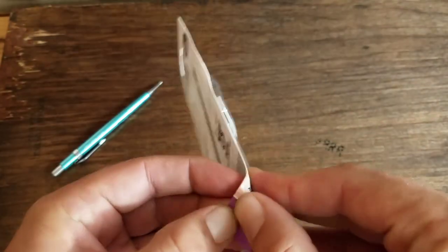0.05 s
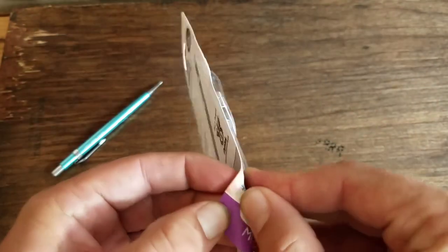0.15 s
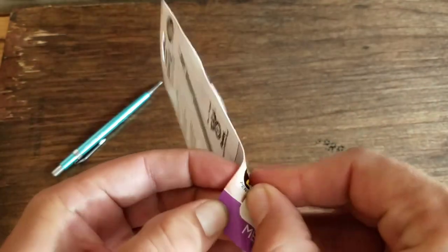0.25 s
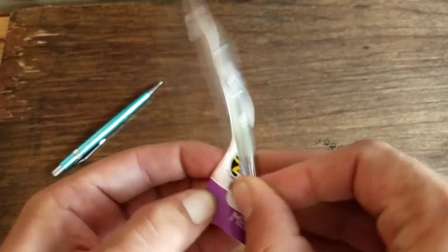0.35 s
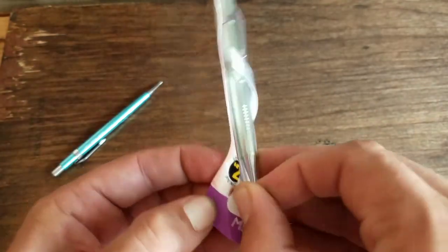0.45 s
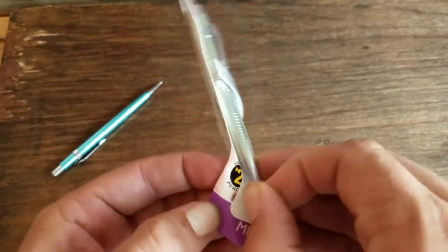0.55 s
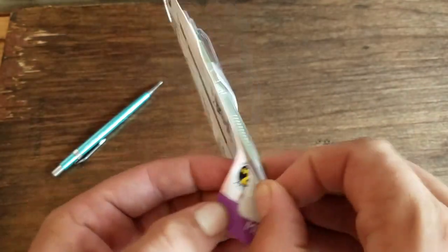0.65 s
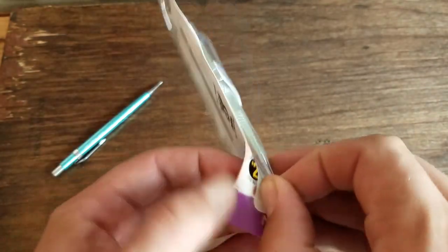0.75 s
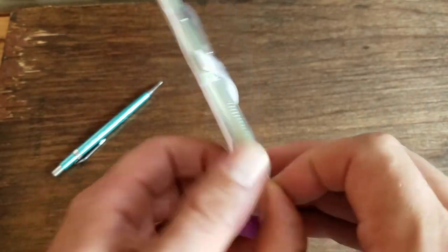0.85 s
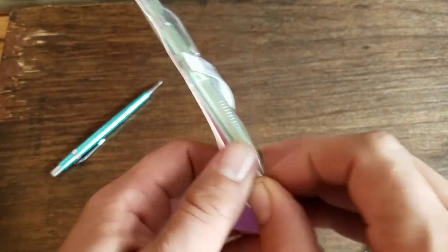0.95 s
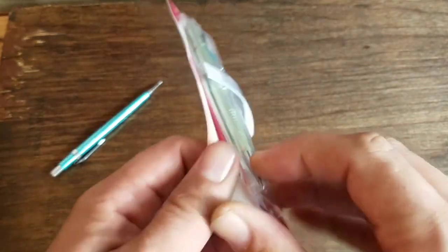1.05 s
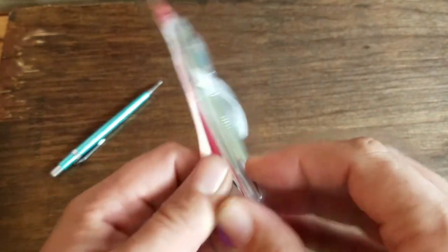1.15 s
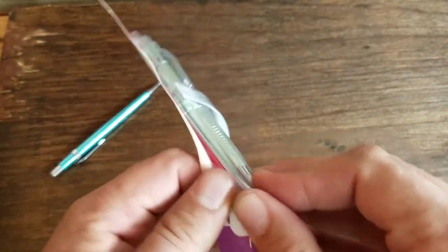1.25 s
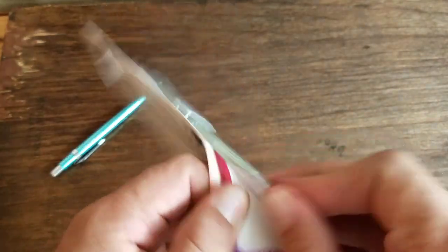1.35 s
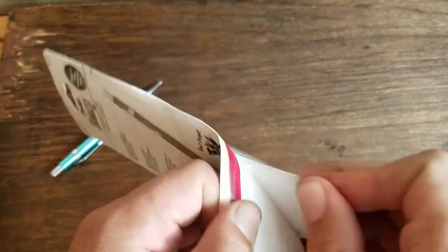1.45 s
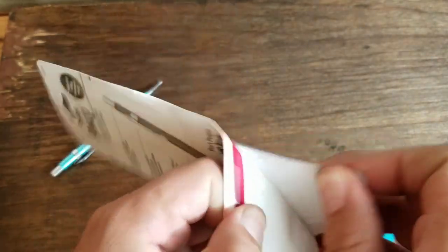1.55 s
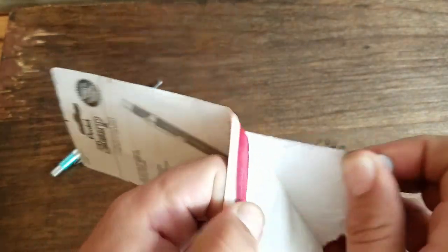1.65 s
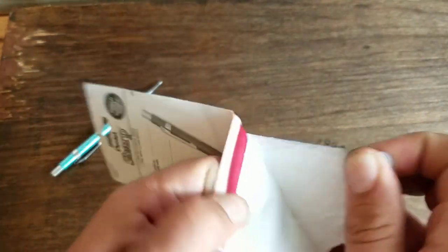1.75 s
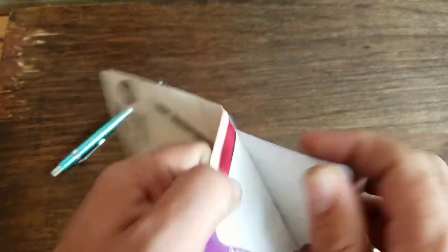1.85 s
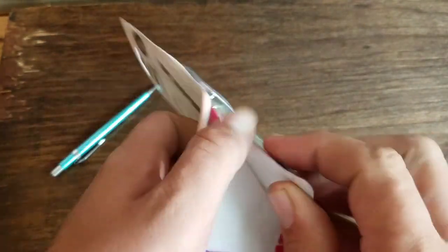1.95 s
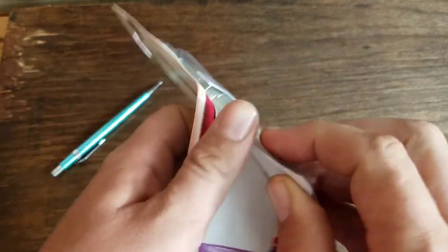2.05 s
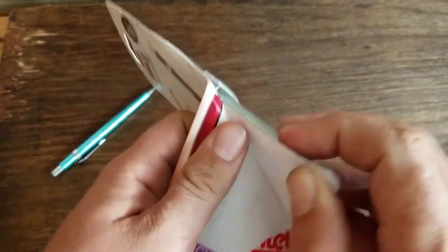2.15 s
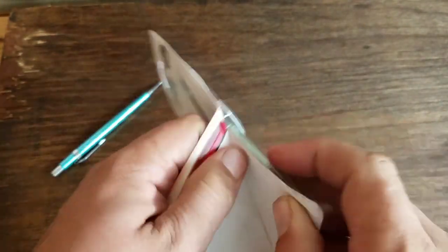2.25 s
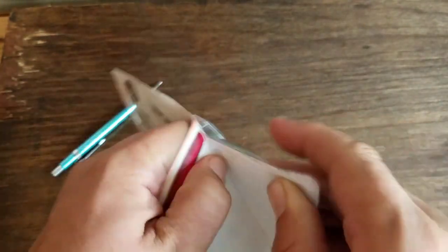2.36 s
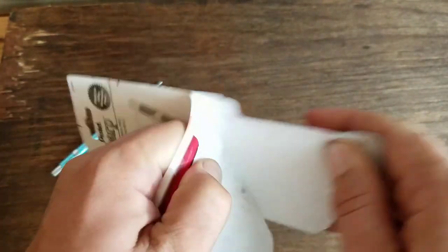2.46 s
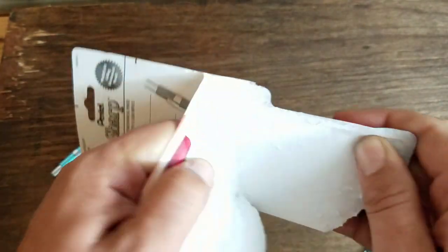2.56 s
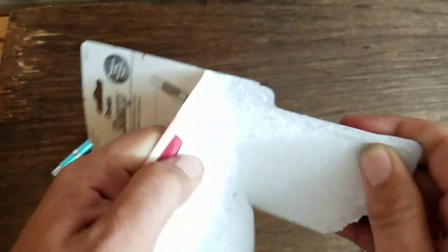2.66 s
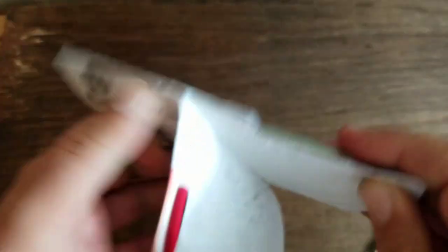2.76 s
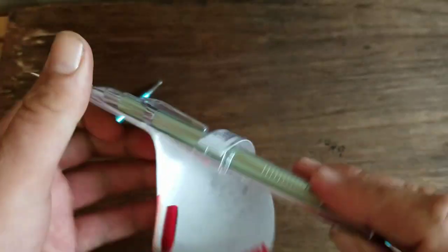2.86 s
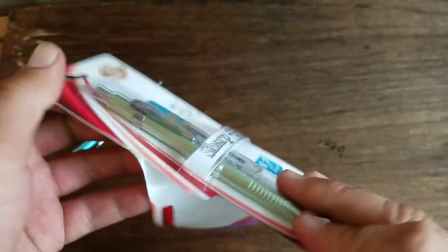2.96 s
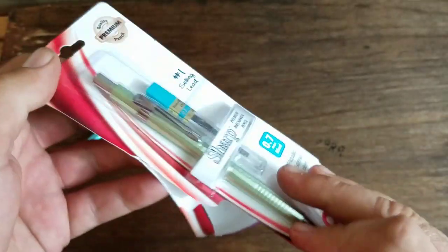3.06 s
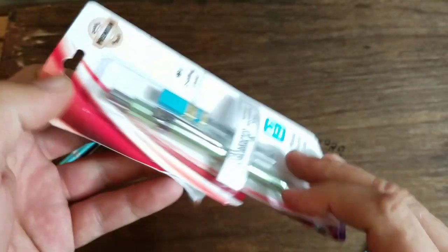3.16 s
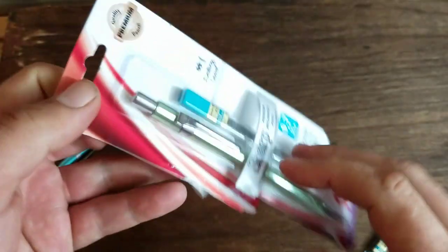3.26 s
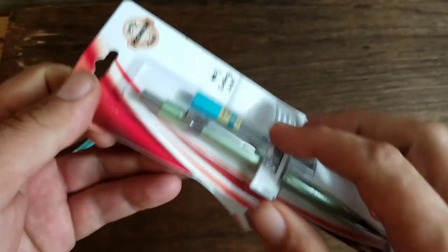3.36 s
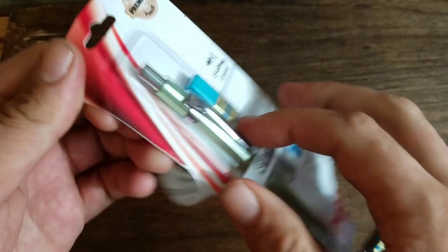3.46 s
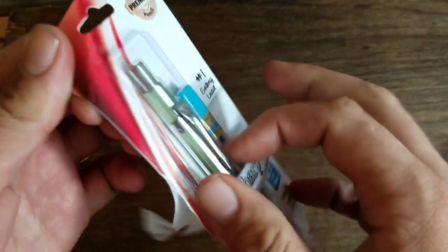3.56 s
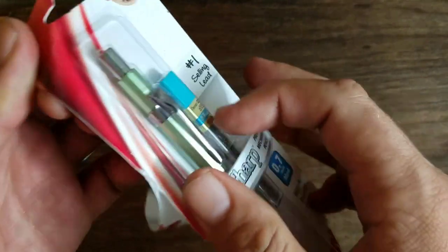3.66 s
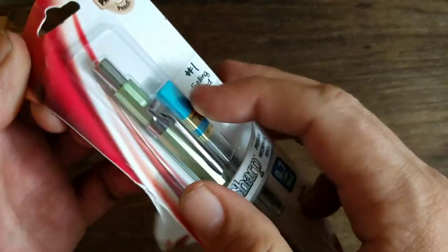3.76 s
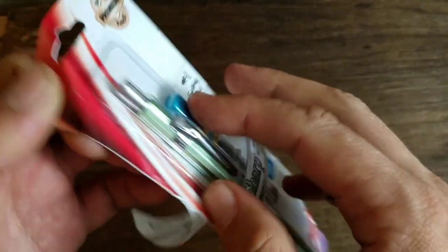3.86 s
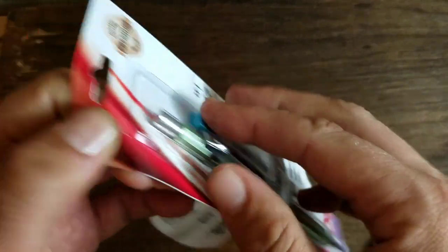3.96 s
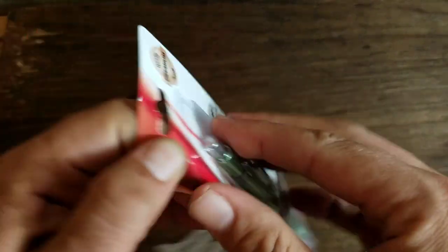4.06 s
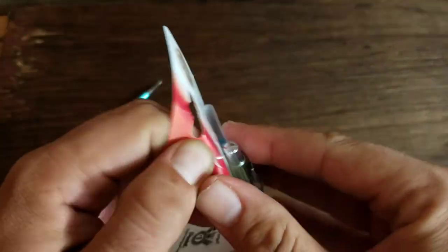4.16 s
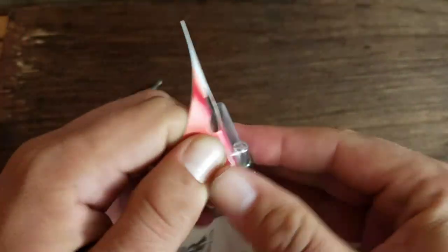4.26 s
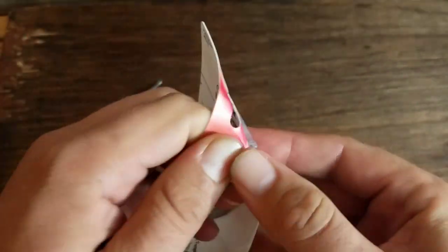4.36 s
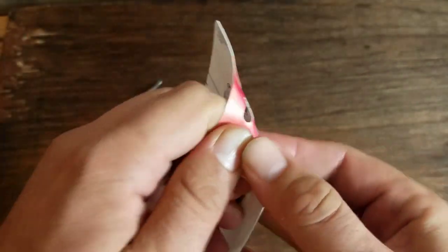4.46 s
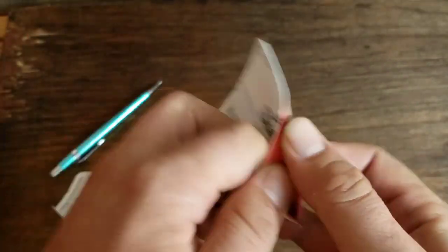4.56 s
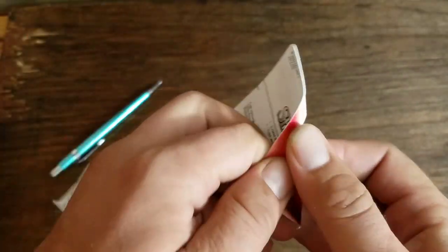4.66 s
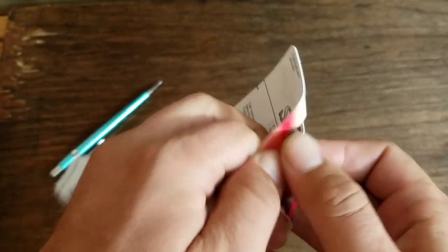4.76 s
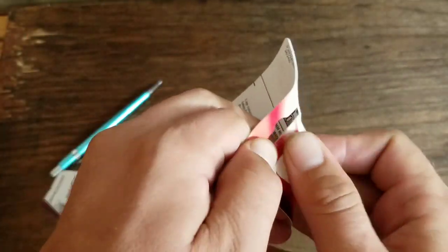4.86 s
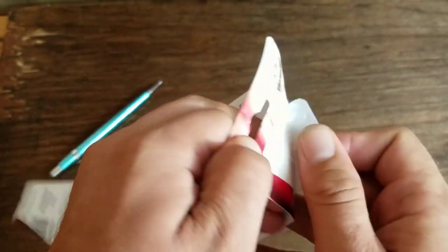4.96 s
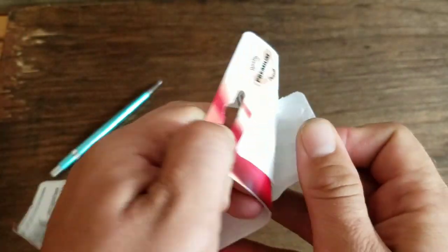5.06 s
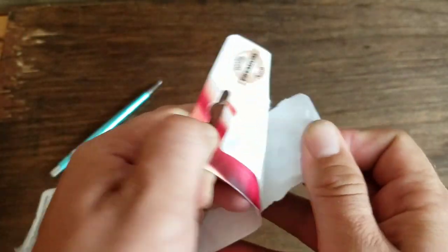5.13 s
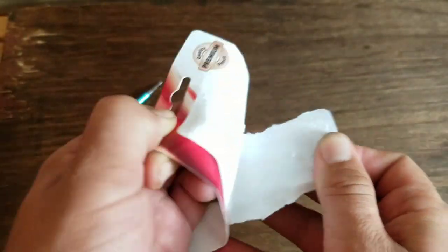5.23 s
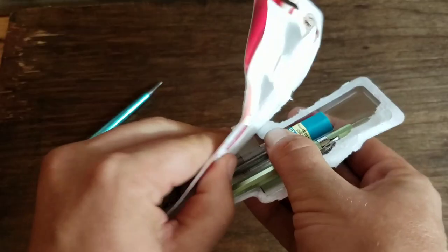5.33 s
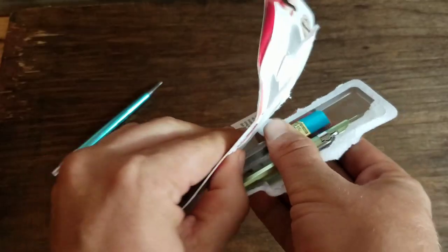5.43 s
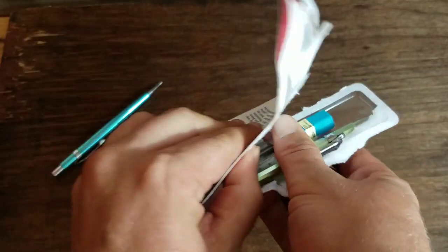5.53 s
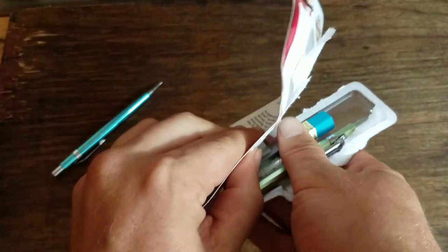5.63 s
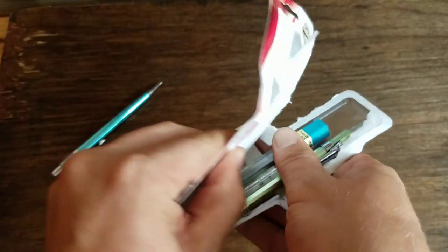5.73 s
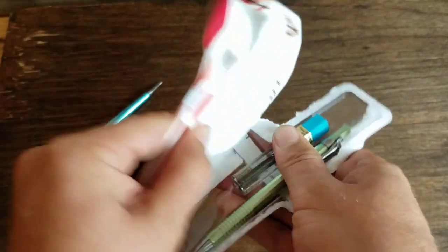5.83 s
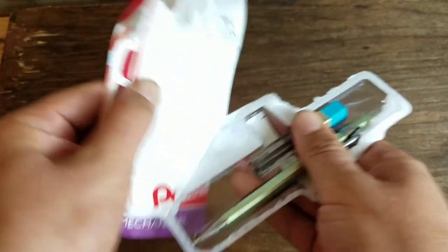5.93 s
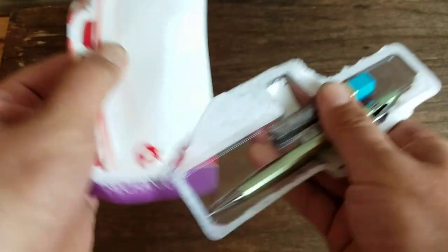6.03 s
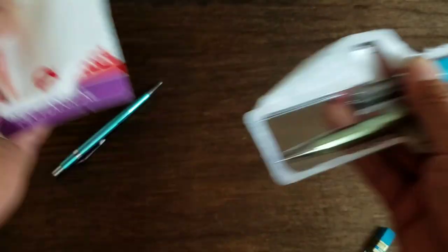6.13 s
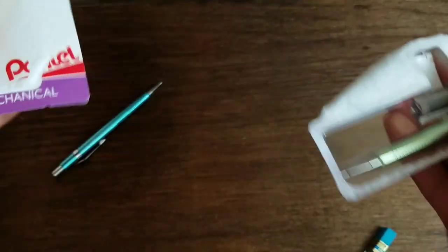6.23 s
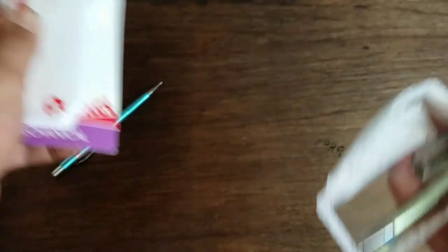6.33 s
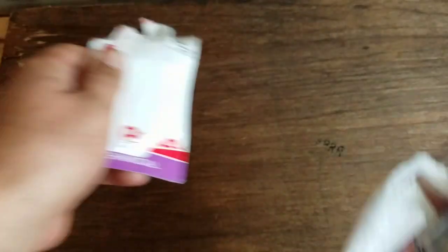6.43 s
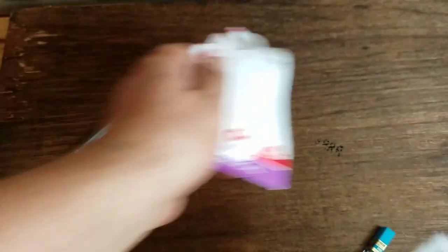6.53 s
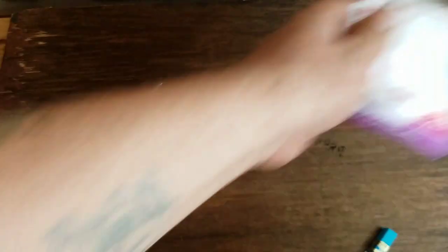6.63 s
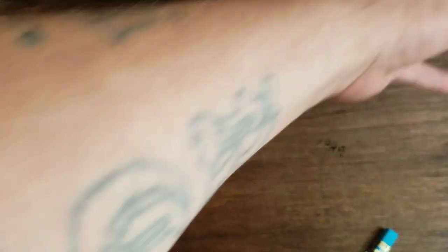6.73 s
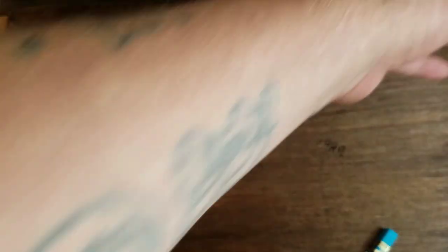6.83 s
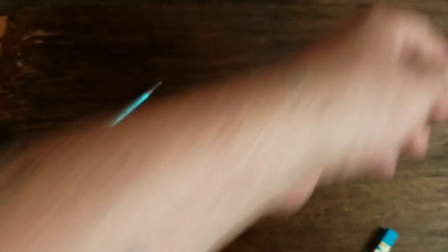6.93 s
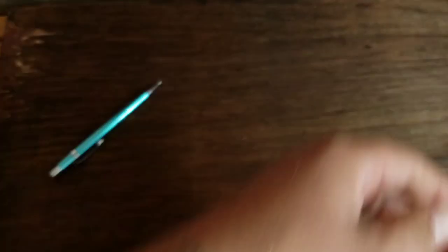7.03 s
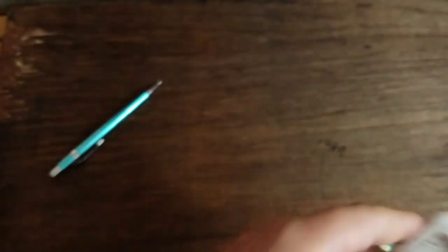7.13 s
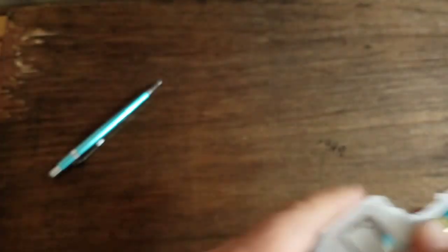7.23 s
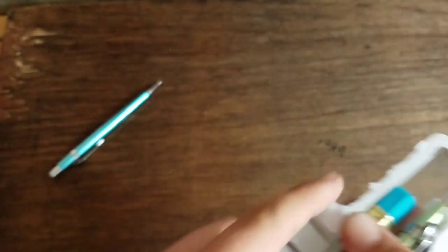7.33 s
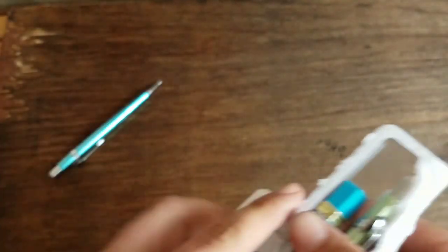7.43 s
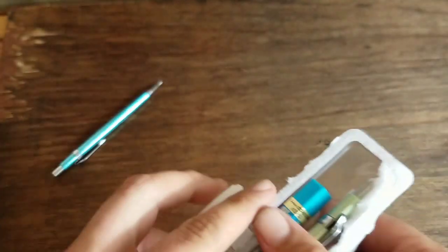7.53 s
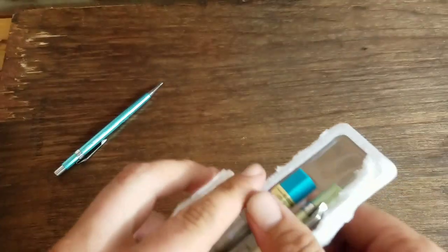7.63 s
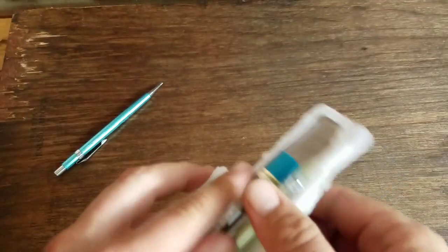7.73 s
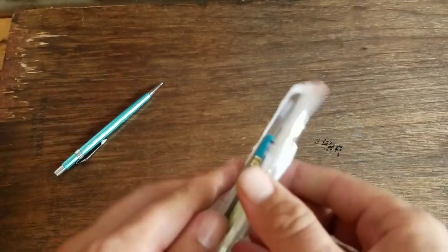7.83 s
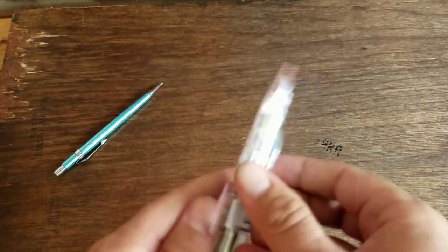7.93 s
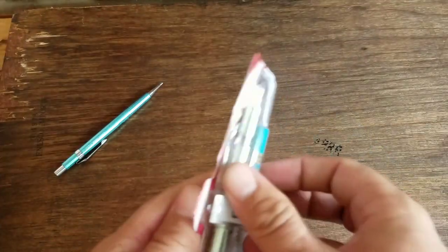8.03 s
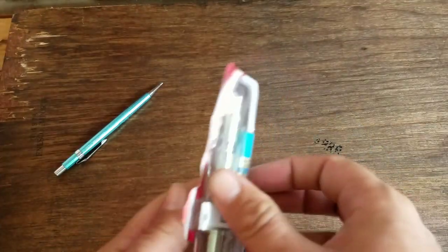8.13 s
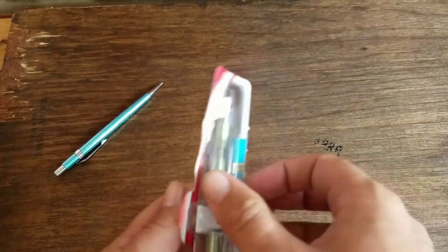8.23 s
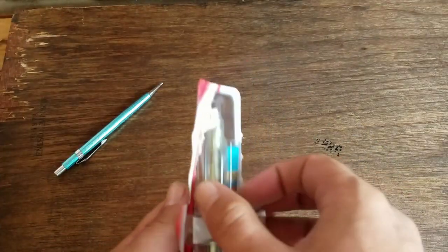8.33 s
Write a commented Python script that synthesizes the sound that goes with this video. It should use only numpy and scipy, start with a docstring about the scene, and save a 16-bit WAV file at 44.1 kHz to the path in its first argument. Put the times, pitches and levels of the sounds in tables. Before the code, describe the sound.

Very close to the microphone, hands work open a card-backed plastic pack. Light fizzing crackles and clicks grow into two fibrous rips with hard plastic pops, then turning and rustling. Two more rough bursts of tearing follow, before a lull with dull bumps on the wooden desk and a few last clicks. Small dry room, low rumble and faint hiss, stereo.

```python
"""At a wooden desk in a small room, two hands peel the card off a plastic blister pack, close to a phone's two ports.
Card fibres break by the thousand: they fizz, shake the card and flap its loose end.
The stiff shell buckles in decaying sines and noise with low knocks; noise-driven modes make short creaks.
Dull sine thumps come off the desk, decaying noise is the room's answer, and shaped noise is low rumble and faint hiss."""
import sys
import numpy as np
from scipy import signal
from scipy.fft import rfft, irfft, next_fast_len
from scipy.io import wavfile
from scipy.ndimage import map_coordinates

SR = 44100
rng = np.random.default_rng(int(sys.argv[2]) if len(sys.argv) > 2 else 0)


def inscribe(sig):
    """Save sig as 16-bit PCM at rate SR to the path in sys.argv[1].

    A 1-D sig is mono; a 2-D sig holds one channel per row.
    Samples are clipped to [-1, 1] before scaling.
    """
    pcm = np.round(np.clip(np.atleast_2d(sig).T, -1, 1) * 32767)
    wavfile.write(sys.argv[1], SR, pcm.astype(np.int16))


N = 369999


def amp(db):
    """Gain of a level in dB."""
    return 10 ** (np.asarray(db) / 20)


def unit(x):
    """x at rms 1."""
    return x / np.sqrt(np.mean(x ** 2) + 1e-20)


def along(points, hz):
    """Read (frequency [Hz], value) points on a log frequency axis."""
    f, v = np.transpose(points)
    return np.interp(np.log(hz + 1), np.log(f + 1), v)


def curves(rows):
    """One value per sample for each column after the time."""
    s, *cols = np.transpose(rows)
    return [np.interp(np.arange(N) / SR, s, c) for c in cols]


def wobble(rate):
    """A smooth random curve, rate knots a second."""
    knots = rng.standard_normal(int(N * 400 / SR) + 4)
    return map_coordinates(knots, [np.arange(N) * min(rate, 399) / SR])


def filtered(x, response):
    """x times a complex response of frequency."""
    m = next_fast_len(N + SR // 2)
    return irfft(rfft(x, m) * response(np.fft.rfftfreq(m, 1 / SR)), m)[..., :N]


def modes(table):
    """The causal response of resonances (frequency [Hz], width [Hz], level [dB]), with alternating signs."""
    def response(f):
        total = 0
        for k, (centre, width, db) in enumerate(table):
            damping = 1j * f * width
            total = total + (-1) ** k * amp(db) * damping / (centre * centre - f * f + damping)
        return total
    return response


def ports(pair, alike):
    """Two unrelated signals mixed to a left and a right that are alike by frequency."""
    def mid_side(hz):
        turn = np.arccos(np.clip(along(alike, hz), -1, 1)) / 2
        return np.array([np.cos(turn), np.sin(turn)])
    mid, side = filtered(pair, mid_side)
    return np.array([mid + side, mid - side])


# colour of the quiet room: (frequency [Hz], relative density [dB per Hz])
AIR_COLOUR = [(15, -39), (25, -1), (136, -11.5), (267, -9), (411, -19), (524, -20.5), (744, -24),
              (898, -29), (1000, -26), (1580, -29.5), (2130, -25.5), (7140, -37.5), (15600, -36.5)]
# how much of the air the ports share: (frequency [Hz], left-right likeness [-1 to 1])
AIR_LIKENESS = [(60, 0.96), (180, 0.97), (550, 0.62), (1650, 0.089), (4970, 0.02), (15000, 0.03)]
# the rumble sinks for a while: (time [s], level before wobble [dB])
RUMBLE_LEVEL = [(0.0, -49), (5.23, -48), (5.28, -62), (6.55, -60.5), (6.9, -50), (8.39, -47)]


def air():
    """Rumble largely shared by both ports, hiss that is nearly each port's own."""
    noise = filtered(rng.standard_normal((2, N)), lambda hz: amp(along(AIR_COLOUR, hz)))
    pair = ports(noise, AIR_LIKENESS)
    low = filtered(pair, lambda hz: 1 / (1 + (hz / 200) ** 4))
    hiss = pair - low
    swell = amp(curves(RUMBLE_LEVEL)[0] + 3.1 * wobble(9.6))
    return (swell * low + amp(-57.5) * hiss) / np.sqrt(np.mean(low ** 2))


# the dying of the room: (frequency [Hz], t60 [s])
ROOM_DECAY = [(200, 0.18), (2000, 0.034), (12000, 0.05)]


def room(x):
    """Each frequency of the answer dies at its own speed; the hands move, so the echoes keep changing."""
    out, step = np.zeros((2, N + SR)), SR // 5
    for at in range(0, N, step):
        hz, t, z = signal.stft(rng.standard_normal((2, SR // 3)), SR, nperseg=256)
        fade = amp(-60 * t / along(ROOM_DECAY, hz)[:, None])
        tail = signal.istft(z * fade, SR, nperseg=256)[1]
        tail[1] = 0.73 * tail[0] + 0.65 * tail[1]  # left and right partly alike
        echo = signal.fftconvolve(x[None, at:at + step], tail / np.linalg.norm(tail[0]), axes=1)
        out[:, at + 90:][:, :echo.shape[1]] += echo  # a gap of 90 samples, about 2 ms
    return out[:, :N]


# hands and card bump the desk: (time [s], relative level [dB], pitch [Hz])
DESK_THUMPS = [(2.694, -48, 207), (3.366, -38.5, 89), (4.902, -37, 114), (6.409, -49, 130),
               (6.618, -49.5, 235), (6.834, -35, 234), (6.862, -45, 121), (6.9, -39.5, 284)]


def thumps():
    """Soft flesh on wood: a softly struck sine dies in a few dull cycles."""
    out, t = np.zeros(N + SR), np.arange(SR // 4) / SR
    for s, db, hz in DESK_THUMPS:
        soft_start = 1 - np.exp(-t / 0.0066)
        fade = amp(db + 11 - 60 * t / 0.12)
        out[round(s * SR):][:len(t)] += fade * soft_start * np.sin(2 * np.pi * hz * t)
    return out[:N]


# the bent shell creaks on one note: (time of the peak [s], level [dB], pitch [Hz], t60 [s])
SHELL_CREAKS = [(1.01, -34.5, 1330, 0.04), (1.963, -17.5, 2490, 0.045), (2.585, -34, 1380, 0.046),
                (5.481, -43, 1820, 0.11), (5.601, -29.5, 1980, .035), (5.888, -25.5, 1750, 0.048),
                (5.942, -31.5, 1430, .06), (6.9, -28.5, 1780, .035), (7.925, -35.5, 2220, 0.072)]
CREAK_RISE, CREAK_WIDTH_HZ = 0.6, 220  # swell time over dying time; breadth of the note


def creaks():
    """Plastic slips on card in quick uneven steps that ring one mode, swelling and dying."""
    out, t = np.zeros((2, N + SR)), np.arange(-SR // 10, SR // 10) / SR
    ringing = t[t >= 0]
    for s, db, hz, t60 in SHELL_CREAKS:
        slips = rng.standard_normal((2, len(t))) * (rng.random(len(t)) < 1500 / SR)
        mode = amp(-27 * CREAK_WIDTH_HZ * ringing) * np.sin(2 * np.pi * hz * ringing)
        note = unit(signal.fftconvolve(slips, mode[None], axes=1)[:, :len(t)])
        swell = amp(db - 60 * np.maximum(t, -t / CREAK_RISE) / t60)
        out[:, round(s * SR) - SR // 10:][:, :len(t)] += swell * note
    return out[:, :N]


# the shell buckles: (time [s], relative level [dB], pitch of the dent [Hz],
#                     knock over the snap, relative [dB], noisy crack over the snap, relative [dB])
SHELL_SNAPS = [(0.026, -33.5, 1830, -27, -19), (0.265, -61, 3500, -30, 5), (0.304, -39, 2846, -30, 6.5),
               (0.416, -44, 1830, -30, 3), (0.495, -13, 2790, -51, -15.5), (0.54, -21.5, 2380, -38, -7),
               (0.648, -27, 2440, -19, -28), (0.734, -37, 2280, -35, -26), (0.747, -23, 2270, -13, 1),
               (0.793, -30, 1890, -39, -11), (1.007, -19.5, 2150, -35, 3.5), (1.066, -50.5, 3540, -30, 14),
               (1.379, -18, 2510, -43, -11), (1.412, -9.5, 2930, -34, -20), (1.57, -29, 3130, -40, 1),
               (1.601, -17.5, 2480, -40, -15.5), (1.692, -25, 2530, -40, -13), (1.765, -26, 1300, -29, -43),
               (1.794, -24, 1400, -33, -37), (1.867, -24, 1530, -29, -3), (1.901, -7, 2460, -17, -27),
               (1.924, -17.5, 1230, -21, -34), (2.058, -6.5, 2530, -15, -17), (2.077, -9, 2620, -28, -29),
               (2.089, -21.5, 2580, -21, -22), (2.156, -24, 2070, -14, -20), (2.178, -25, 1510, -31, -17),
               (2.228, -16.5, 2960, -41, -9.5), (2.36, -3.5, 1780, -32, -23), (2.397, -9, 2260, -33, -21),
               (2.539, -13, 2880, -30, -20), (2.551, -18, 2570, -28, -9), (2.5811, -11.5, 2960, -37, -5.5),
               (2.641, -19.5, 1470, -12, -7), (2.685, -26, 2170, -3, -2), (3.352, -22, 1480, -11.5, -11),
               (3.497, -37, 2280, -13, -3), (3.811, -34, 2640, -23, 4), (3.916, -30, 1260, -36, -8),
               (3.956, -24.5, 2830, -35, -10), (3.99, -27.5, 1420, -11, -35), (4.498, -36, 1390, -7, -10),
               (4.658, -25, 1920, -29, -27), (4.703, -26, 4060, -14, -12), (4.757, -25, 2850, -30, -21),
               (4.823, -17.5, 1900, -49, -13.5), (4.84, -31, 4270, -40, -13), (4.878, -35, 3800, -37, 20),
               (4.906, -24.5, 4550, -48, -0.5), (4.938, -12, 4760, -46, -13), (5.103, -6, 3230, -50, -28),
               (5.123, -11, 2170, -43, -16), (5.138, -15, 3270, -39, -27), (5.194, -9.5, 3240, -46, -21.5),
               (5.296, -32, 2340, -36, -23), (5.452, -28, 1740, -16, -4.5), (5.53, -25, 1790, -36, -18),
               (5.596, -16, 2180, -44, -7), (5.699, -19, 2350, -42, -26), (5.746, -15, 1960, -44, -16),
               (5.766, -22, 1840, -40, -33), (5.783, -22, 1510, -40, 1), (5.817, -14.5, 1420, -20, -37),
               (5.844, -6.5, 1510, -30, -20), (6.211, -47, 4160, -18, 18), (6.836, -23.5, 900, -7, -4),
               (6.89, -25, 3200, -33, -7), (6.897, -16.5, 1890, -10, -31), (6.942, -18, 2190, -13.5, -14.5),
               (7.141, -29.5, 1380, -5.5, -7), (7.268, -40, 1450, -5, -14), (7.387, -32, 1380, -10, -15),
               (7.442, -20.5, 2330, -15.5, -17), (7.757, -19, 2050, -22, -15), (7.926, -22, 2240, -24, 0),
               (7.971, -33, 2200, -30, -2), (7.995, -23, 2060, -11.5, 0.5), (8.041, -32, 1850, -7, -2),
               (8.323, -21.5, 2740, -24, -15)]
# modes of a dent: (multiple of its pitch, relative level [dB])
DENT_MODES = [(0.452, -11.5), (.7, -1.5), (0.998, 10), (1.302, 3), (1.7, -2.5)]
# body of pack and desk: (frequency [Hz], width [Hz], relative level [dB])
KNOCK_MODES = [(125, 64, -6), (299, 110, 4), (670, 120, -0.5)]
RATTLE_DB = -1.5  # energy of the springing back's impulse train, before the fingers damp it


def snaps():
    """Each dent pops, rings for a few cycles, rattles back and knocks the pack; one row for each face of the shell."""
    ring, blows, t = np.zeros((2, N + SR)), np.zeros(N), np.arange(SR // 8) / SR
    attack = 1 - np.exp(-t / 0.0003)
    for s, db, hz, knock_db, crack_db in SHELL_SNAPS:
        pop = amp(crack_db + 9.0 - 60 * t / 0.0055) * rng.standard_normal((2, len(t)))
        chance = rng.standard_normal((len(DENT_MODES), 2, 2, 1))  # uneven level and tuning per mode and face
        for (multiple, level), (a, b) in zip(DENT_MODES, chance):
            fade = amp(level + 1.5 * a - 60 * t * multiple / 0.006) * attack
            pop += fade * np.sin(2 * np.pi * hz * multiple * (1 + 0.053 * b) * t)
        rattle = (rng.random(len(t)) < 900 / SR) * amp(-60 * t / 0.035) * rng.standard_normal(len(t))
        rattle *= amp(RATTLE_DB) / np.linalg.norm(rattle)
        damped = pop * amp(-60 * t / 0.02)  # fingers damp the rattle
        back = signal.fftconvolve(damped, rattle[None], axes=1)[:, :len(t)]
        ring[:, round(s * SR):][:, :len(t)] += amp(db - 8.5) * (pop + back)
        blows[round(s * SR)] = amp(db + knock_db + 35.0)
    return ring[:, :N] + filtered(blows, modes(KNOCK_MODES))


# the grip: (time [s], pitch of the free card [Hz], left over right [dB], share of the finest fibres [0-1])
HAND_GRIP = [(0.0, 1840, 1, 1), (0.42, 2570, 1, 0.98), (1.1, 1710, -0.5, 0.62), (1.19, 2700, -0.5, 0.84),
             (2.92, 1800, 0, 0.69), (4.49, 1760, 0, 0.6), (5.3, 2300, -1, 0.75), (5.42, 1930, -1, 0.64),
             (8.13, 2190, -1, 0.59), (8.39, 2780, 0, 0.8)]
# the pack merely held and turned: (time [s], relative card level [dB], fibre fizz over it, relative [dB])
HELD_PACK = [(0, -70, -12), (.4, -68.5, -30), (.9, -57, 0.5), (1.1, -68, 1.5), (1.85, -46, -11),
             (2.1, -55, -5), (2.85, -60, -6.5), (3.3, -53.5, -4.5), (3.7, -70.5, -12), (4.15, -72.5, -21),
             (4.55, -53, -8), (5.4, -59.5, -9), (5.6, -52.5, 2), (6.3, -66.5, -4), (6.75, -85, 10),
             (7.0, -58, -12), (7.15, -59.5, -6), (7.6, -65, -5), (8.15, -50.5, -7.5), (8.39, -55, -7)]
HELD_FLAP_DB = -1.5  # the loose end over the card while held, relative
# fingers shift on the pack: (time [s], held time [s], relative card level [dB],
#                             fibre fizz over it, relative [dB], flap over it, relative [dB])
FINGER_RUSTLES = [(0.059, 0.1, -64.5, 13.5, -6), (0.2, 0.1, -61.5, 13, -6), (0.504, 0.052, -41, -3, -15),
                  (0.548, 0.044, -50.5, 11.5, -12), (0.655, 0.01, -50.5, -21, -8),
                  (0.748, 0.022, -51.5, -4, -12), (0.978, 0.052, -51.5, -3, -23),
                  (1.907, 0.058, -34, -11, -11), (2.067, 0.034, -38.5, -30, -3),
                  (3.2, 0.021, -49.5, -1, -15), (3.363, 0.0059, -42, -10.5, 1), (3.51, 0.0071, -57, -7, -7),
                  (3.81, 0.0033, -44, -11, -0.5), (3.918, 0.048, -47, -20, -3),
                  (3.999, 0.0073, -40, -11, -9), (4.352, 0.038, -59, -1, 3.5),
                  (4.514, 0.015, -53, -0.5, -1), (5.298, 0.0069, -31.5, -6, -11),
                  (5.463, 0.015, -42.5, -26, -2.5), (5.602, 0.042, -43.5, -4, -26),
                  (6.15, 0.035, -54.5, -4, -1), (6.22, 0.053, -65, 14, 11), (6.635, 0.0026, -53.5, 0, 5),
                  (6.849, 0.011, -42, -12, 5), (6.898, 0.0096, -34, -18, -10),
                  (6.949, 0.0046, -38, -30, -1), (7.25, 0.01, -54, -3, 4.5), (7.36, 0.028, -51, -9, 1),
                  (7.438, 0.0062, -42, -9, -0.5), (7.621, 0.012, -54, -10, -12),
                  (7.76, 0.0016, -44.5, -4, -2), (7.918, 0.0074, -38.5, 0.5, -3),
                  (8.031, 0.027, -53.5, 0, 7.5), (8.322, 0.002, -46.5, -13, 0.5)]
RISE_DB_PER_S, FALL_DB_PER_S = 613, 330  # how a rustle comes and goes
# five tears, one curve each: (time [s], relative pull on the card [dB], fibre fizz over it, relative [dB],
#                              loose end over it, relative [dB], pitch of the free card [Hz])
CARD_TEARS = [
    [(1.155, -58, 6.5, -6, 2620), (1.239, -49.5, 8.5, -15, 3340), (1.299, -48, 5.5, -19, 3100),
     (1.343, -27.5, -1, -25, 3100), (1.409, -27.5, -4, -22, 2570), (1.453, -43, -2, -31, 2780),
     (1.569, -30.5, -0.5, -11.5, 3020), (1.693, -33.5, 1, -14.5, 2630), (1.745, -47, -2, -20, 1970),
     (1.8, -68, -31, -8, 1480)],
    [(2.19, -42, -9, -17, 2580), (2.234, -39, 1.5, -13, 2720), (2.34, -34.5, -1, -12, 2100),
     (2.358, -24, -6.5, -22, 1940), (2.408, -23.5, -2, -17, 2360), (2.432, -20.5, -5.5, -17, 1720),
     (2.578, -31.5, -2.5, -24, 2260), (2.634, -39.5, -7.5, -1, 1760), (2.74, -39.5, -8.5, 3, 2010),
     (2.81, -63, 3.5, -13, 2170)],
    [(4.64, -59.5, -6, -2, 1950), (4.694, -49, 4, 1, 3060), (4.704, -45.5, -3, -13, 3510),
     (4.73, -43.5, -1, 1, 3270), (4.766, -40.5, 5.5, -15, 2800), (4.796, -46.5, 4.5, -17, 2250),
     (4.83, -38, 3, -23, 2020), (4.872, -49, 11, -9, 2580)],
    [(4.872, -46.5, 10, -3, 3120), (4.903, -30, 8, -9, 3280), (4.941, -35, 4, -27, 3430),
     (4.977, -38.5, 1.5, -17, 3080), (5.023, -29.5, 0, -30, 3360), (5.055, -35, 2.5, -23, 3280),
     (5.139, -24.5, 0, -15, 2610), (5.219, -30, -1, -24, 2510), (5.255, -35, -7, -5, 2080),
     (5.28, -60, -5, -19, 2090)],
    [(5.67, -51, -15, 5, 2240), (5.7, -38.5, -2.5, -17, 2250), (5.738, -38, -5, -6, 2000),
     (5.746, -31, -6.5, -23, 1960), (5.796, -35.5, -0.5, -12, 1820), (5.846, -23, -2, -7, 1890),
     (5.95, -28.5, -6, -1, 1640), (5.992, -38.5, 0, -3, 2150), (6.06, -29, -5.5, 4, 1970),
     (6.1, -59, 5, -23, 2140)],
]


def effort():
    """Levels of card, fizz and flap in dB and the card's pitch: tears and rustles add their power to the holding."""
    t = np.arange(N) / SR
    card_db, fizz_db = curves(HELD_PACK)
    power = amp(2 * (card_db + np.array([0 * t, fizz_db, 0 * t + HELD_FLAP_DB])))
    pitch_hz = curves(HAND_GRIP)[0]
    for s, held, db, fizz_db, flap_db in FINGER_RUSTLES:
        rise_db = -RISE_DB_PER_S * np.maximum(s - t, 0)
        fall_db = -FALL_DB_PER_S * np.maximum(t - s - held, 0)
        power += amp(2 * (db + rise_db + fall_db)) * amp([[0], [2 * fizz_db], [2 * flap_db]])
    for rows in CARD_TEARS:
        on = (t >= rows[0][0]) & (t < rows[-1][0])
        db, fizz_db, flap_db, hz = curves(rows)
        power += on * amp(2 * (db + np.array([0 * t, fizz_db, flap_db])))
        pitch_hz = np.where(on, hz, pitch_hz)
    return *(10 * np.log10(power)), pitch_hz


def breaks(rate, spread_db):
    """Fibres break at random moments, spread_db making some far harder; power holds at any rate; a row per tear edge."""
    when, size, sign = rng.random((3, 2, N))
    force = amp(-spread_db * np.log(size + 0.0039))
    return (when < rate / SR) * force * np.sign(sign - 0.5) / np.sqrt(rate)


# colour of the breaking fibres: (frequency [Hz], relative level [dB])
FIZZ_COLOUR = [(2350, -20), (4000, -2), (4970, -0.5), (5790, -4.5), (7610, -3), (10500, -1.5),
               (13000, -6.5), (15200, -1.5), (15600, -42)]


def fibre_fizz(breaking):
    """Breaking fibres fizz in two bands that flutter apart; the grip sets the share of the finest, highest one."""
    fibres = filtered(breaking, lambda hz: amp(along(FIZZ_COLOUR, hz)))
    finest = filtered(fibres, lambda hz: 1 / (1 + (9500 / (hz + 1)) ** 8))
    share = np.clip(curves(HAND_GRIP)[2], 0, 0.97)
    high = unit(amp(1.8 * wobble(30)) * finest)
    rest = unit(amp(0.16 * wobble(33)) * (fibres - finest))
    return share * high + np.sqrt(1 - share ** 2) * rest


# modes of the card: (frequency [Hz], width [Hz])
CARD_MODES = [(1350, 240), (1820, 730), (2200, 890), (2600, 480), (3200, 610), (4100, 1500)]


def card_shake(coarse, pitch_hz):
    """The freed span of card changes, so the modes nearest its pitch speak loudest."""
    near = np.array([amp(-70 * np.log(hz / pitch_hz) ** 2 + 4.0 * wobble(18)) for hz, _ in CARD_MODES])
    voices = [unit(filtered(coarse, modes([(hz, width, 0)]))) for hz, width in CARD_MODES]
    return sum(gain * voice for gain, voice in zip(near, voices)) / np.linalg.norm(near, axis=0)


# modes of the loose end: (frequency [Hz], width [Hz], relative level before the response is squared [dB])
FLAP_MODES = [(348.6, 72, -4), (597, 556, 2), (730, 765, 0.5)]


def flap_end(breaking):
    """The loose end takes the breaks through its low modes twice over."""
    return unit(filtered(breaking, lambda hz: modes(FLAP_MODES)(hz) ** 2))


def peel():
    """All breaks fizz and flap the loose end; the coarse ones alone shake the card."""
    card_db, fizz_db, flap_db, pitch_hz = effort()
    jerk = 0.4 * wobble(45) + 0.9 * wobble(220)  # the tear advances in jerks
    gentle = np.clip((-35 - card_db) / 20, 0, 1)  # light handling: fewer, more separate crackles
    fine = amp((2.0 + 2.0 * gentle) * jerk) * breaks(rate=9100, spread_db=2.0)
    coarse = amp((2 + 1.43 * gentle) * jerk) * breaks(rate=3000 * amp(-12 * gentle), spread_db=0.0)
    coarse = coarse + 0.24 * breaks(rate=200, spread_db=2.5)[0]  # now and then a glued spot lets go at once
    fizz = amp(fizz_db + 0.5) * fibre_fizz(fine + 1.27 * coarse)
    card = amp(card_db - 5.0) * card_shake(coarse, pitch_hz)
    flap = amp(flap_db - 6.5) * flap_end(coarse + 3.3 * fine)
    return fizz + card + flap


# the pack is wide: (frequency [Hz], left-right likeness [-1 to 1])
PACK_LIKENESS = [(300, 1), (1500, 0.66), (3000, 0.79), (6000, 0.29), (15000, 0.043)]
PORT_LAG_S = 6e-5  # the right port is farther from the hands


def scene():
    """The pack reaches the left port first; the room follows, over desk thumps and air."""
    pack = peel() + snaps() + creaks()
    lag = lambda hz: np.exp(1j * np.pi * hz * PORT_LAG_S * np.array([[1], [-1]]))
    pan_db = curves(HAND_GRIP)[1]
    near = filtered(ports(pack, PACK_LIKENESS), lag) * amp(np.array([pan_db, -pan_db]) / 2)
    return near + amp(-10.0) * room(pack[0]) + thumps() + air()


TOP_HZ = 15750  # band limit


def record(dry):
    """The phone drops the deepest bass and keeps nothing above its band limit."""
    return filtered(dry, lambda hz: (hz < TOP_HZ) * hz ** 4 / (hz ** 4 + 33 ** 4))


dry = scene()
out = record(dry)
inscribe(out)
```